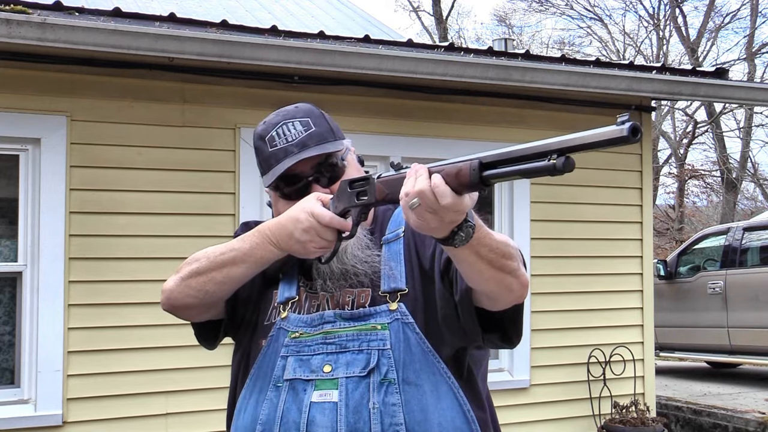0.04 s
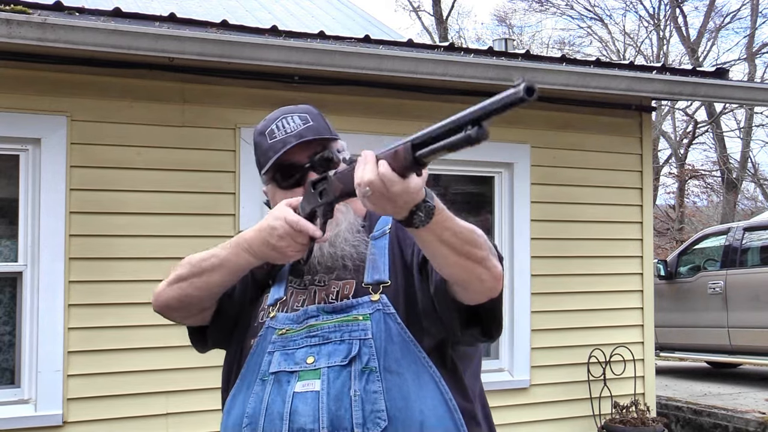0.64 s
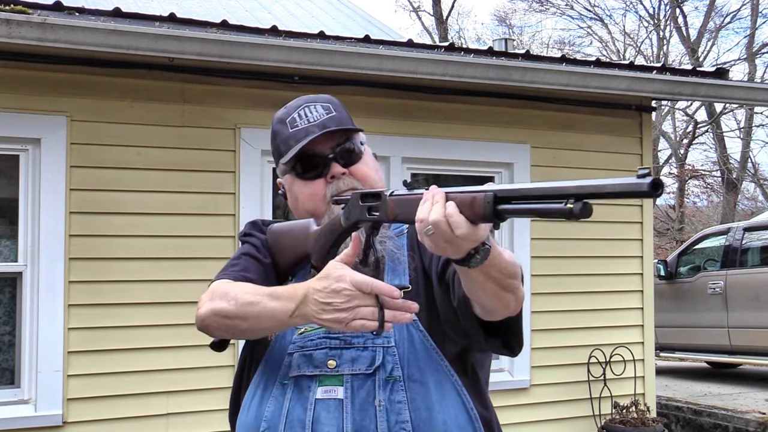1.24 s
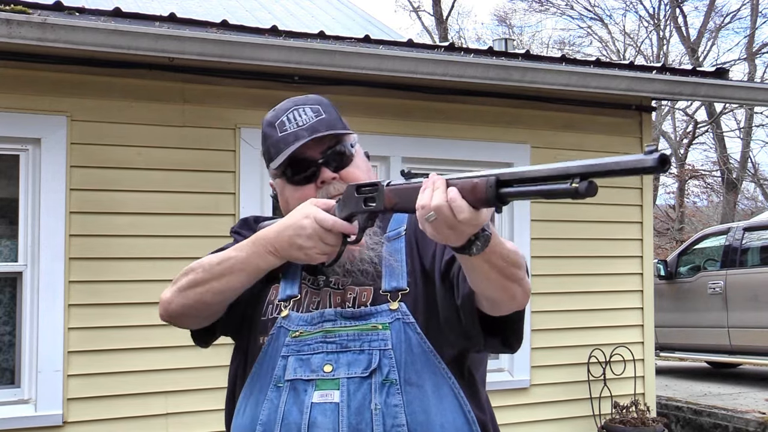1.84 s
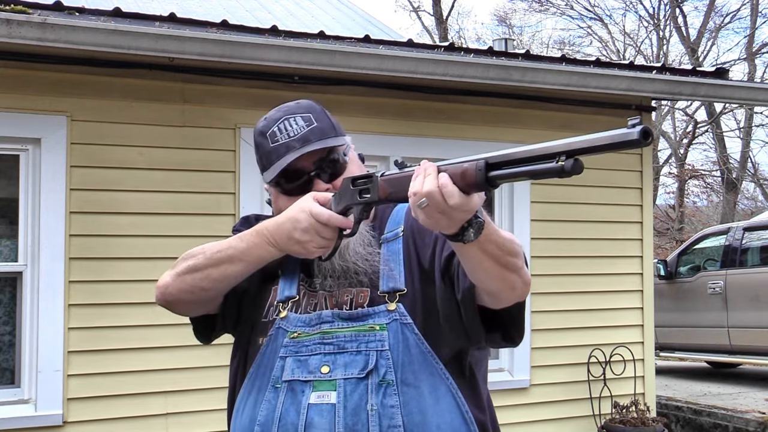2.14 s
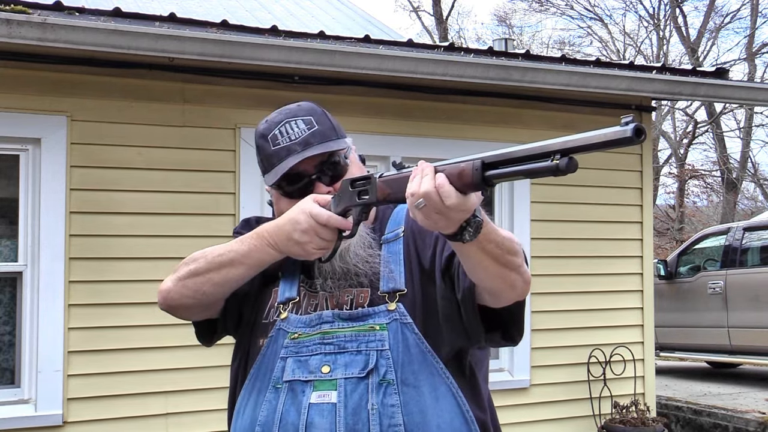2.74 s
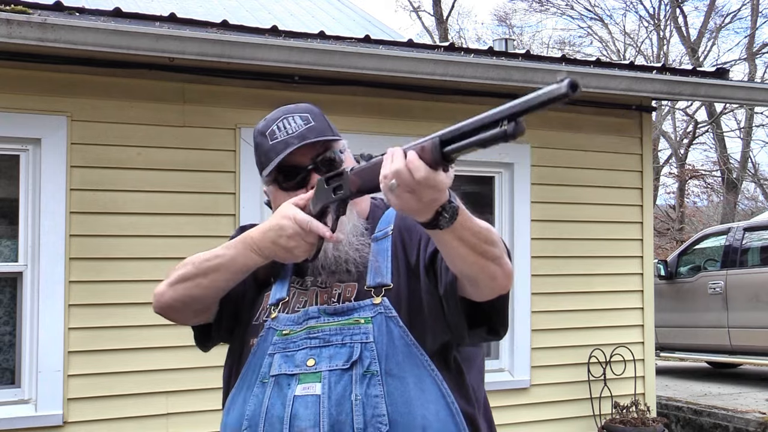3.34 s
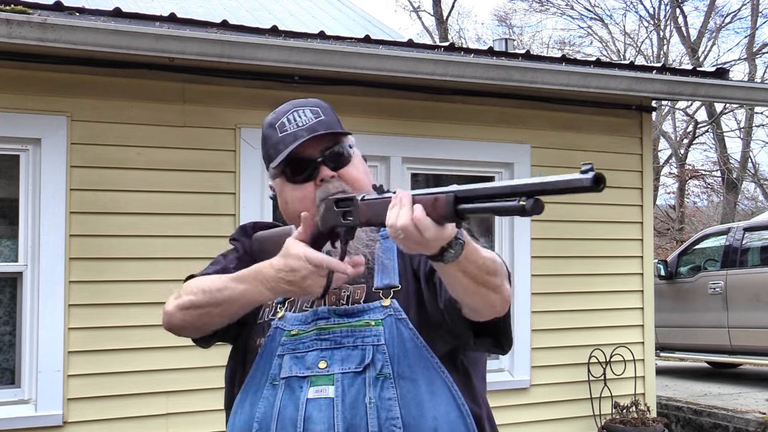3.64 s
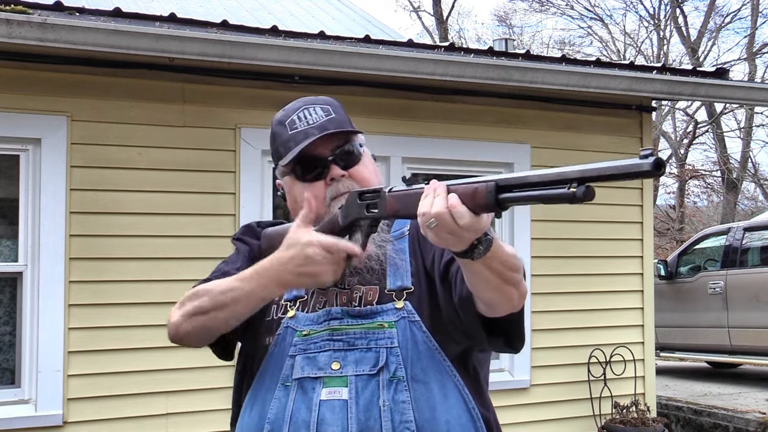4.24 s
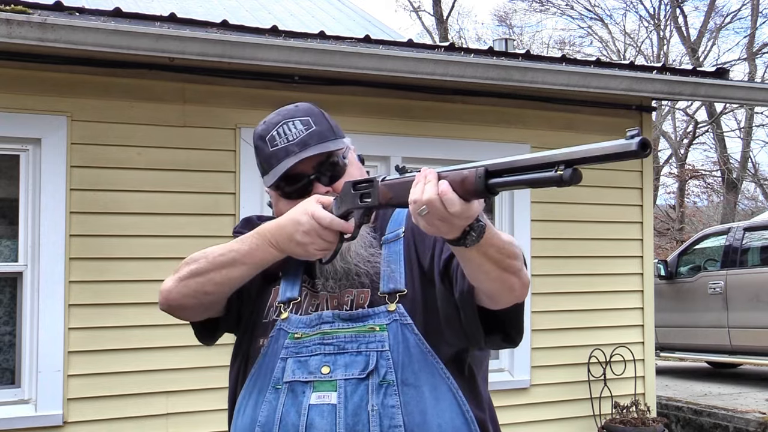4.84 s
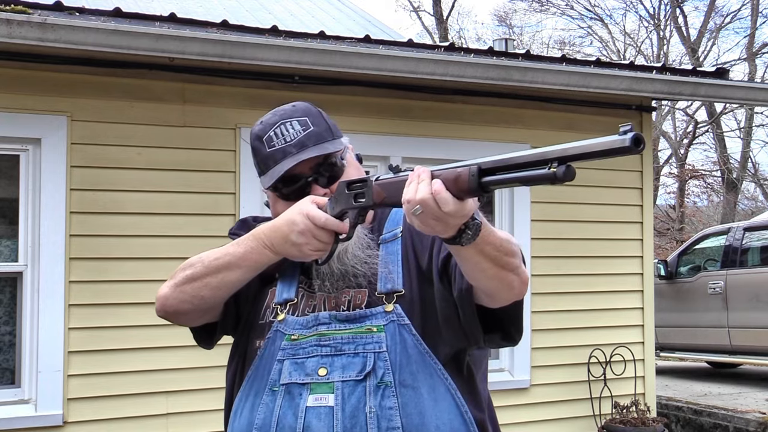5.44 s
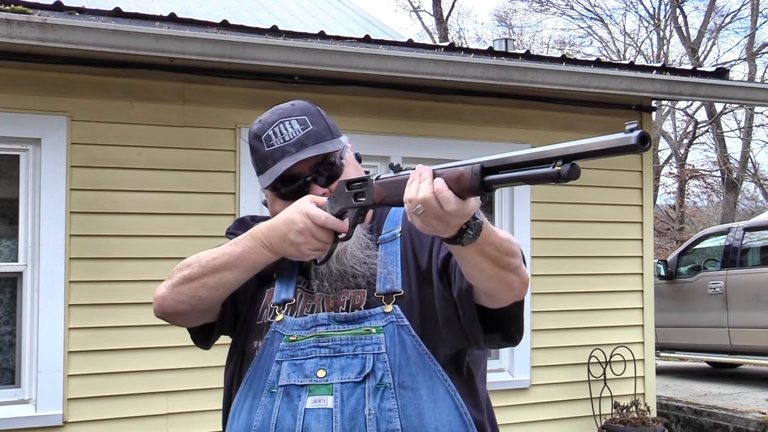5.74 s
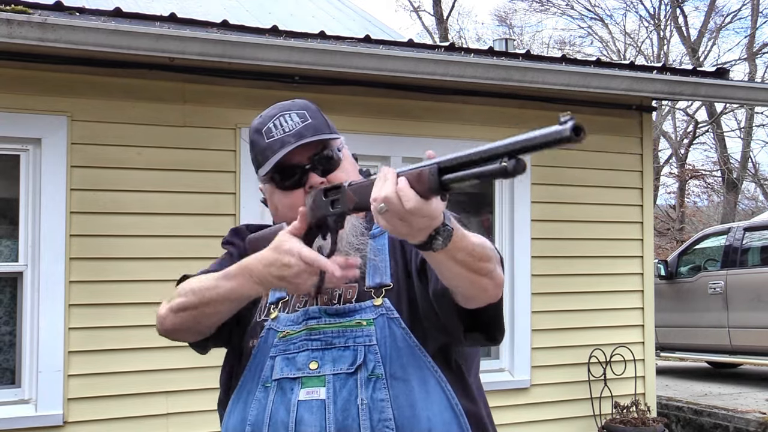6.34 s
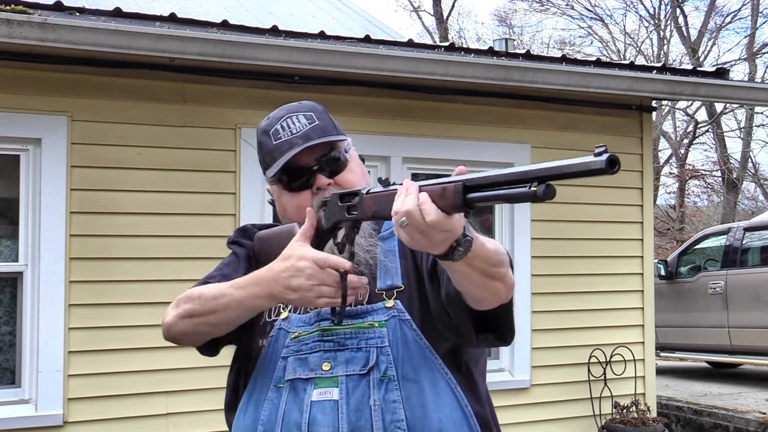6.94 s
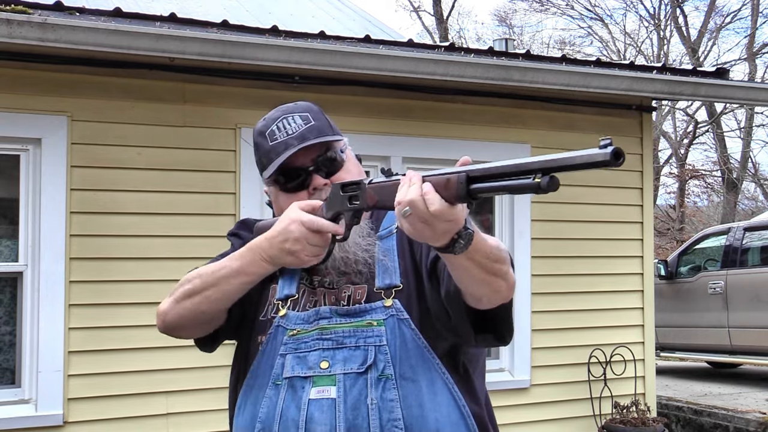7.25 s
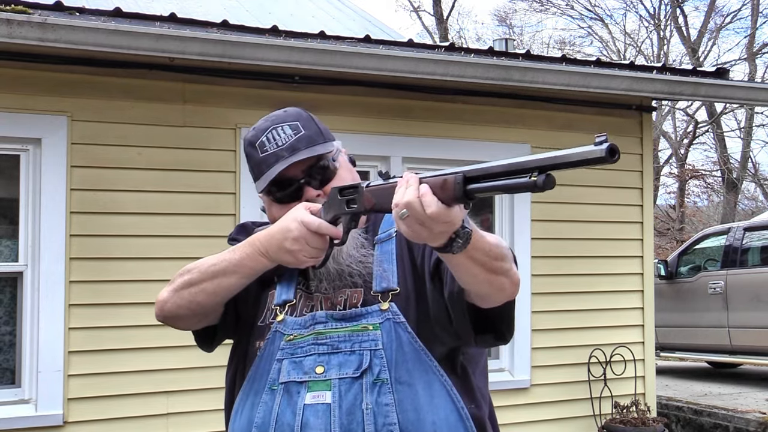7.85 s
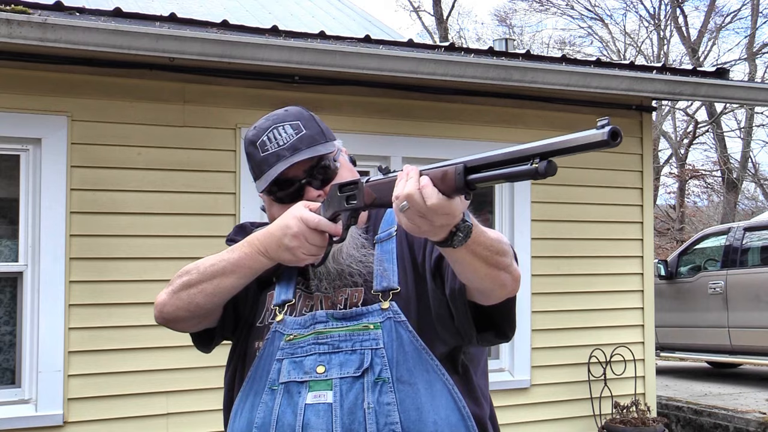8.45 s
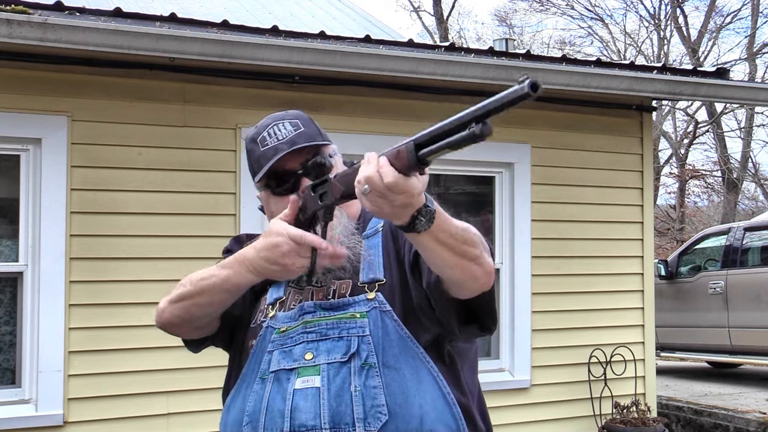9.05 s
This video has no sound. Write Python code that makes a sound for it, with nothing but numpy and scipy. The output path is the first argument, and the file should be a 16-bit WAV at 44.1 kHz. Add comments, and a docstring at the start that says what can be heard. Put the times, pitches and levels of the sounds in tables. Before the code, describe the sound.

Four loud rifle shots echo outdoors, with a lever action clacking and spent brass cases clinking between them.

```python
"""Lever-action rifle in a yard

Four shots are fired between a house and bare woods. Each blast overloads the microphone and rolls
back from the trees, its level held by fast limiters. Between shots the lever opens and shuts, steel
striking steel, and the spent brass case flies out ringing in its tube modes and bounces close by.
Gusts buffet the microphone and stir dry leaves."""
import sys
import numpy as np
from scipy import signal
from scipy.fft import rfft, irfft, next_fast_len
from scipy.io import wavfile
from scipy.ndimage import uniform_filter1d, minimum_filter1d

SR = 44100
rng = np.random.default_rng(int(sys.argv[2]) if len(sys.argv) > 2 else 0)


def digitize_waveform(pressure):
    """Quantize a signal to 16-bit integers and store it at the path in sys.argv[1].

    Rows of a 2-D input are taken as channels; values are limited to [-1, 1].
    """
    field = np.atleast_2d(pressure).T
    bounded = np.clip(field, -1, 1)
    quanta = np.round(bounded * 32767).astype(np.int16)
    wavfile.write(sys.argv[1], SR, quanta)


N = 400851

# spectra of rustling, metal contact and a clattering surface: (f/Hz, relative level/dB)
RUSTLE_SPECTRUM = [(300, -10.5), (1000, -4.5), (2800, -1), (4000, -3.5), (5800, -2.5), (9000, -12),
                   (15000, -22.5)]
STEEL_SPECTRUM = [(300, -34), (900, 0.5), (5500, 3), (8000, -1.5), (11500, -5.5), (15000, -20)]
CLATTER_SPECTRUM = [(300, -10.5), (1100, 1), (2500, 3.5), (4700, 8.5), (6300, 6.5), (8400, -5.5),
                    (12000, -6.5), (15000, -21)]
# modes of a knocked surface: (f/Hz, level/dB, T60/s)
SURFACE_MODES = [(1086, -11, 0.042), (1826, -21, 0.073), (2916, -3.5, 0.023), (5550, -8, 0.024)]
# lever openings: (unlock t/s, eject t/s, rear stop t/s, case glances off t/s, ring/dB, low modes/dB)
OPENINGS = [(1.015, 1.16, 1.176, 1.198, -10, -4.5), (3.749, 3.927, 3.961, 3.94, -2, -6),
            (6.464, 6.606, 6.647, 6.651, -9.5, -15)]
# hard landings of the case: (t/s, impact/dB, clatter/dB, nominal T60/s, ring/dB, high modes/dB)
LANDINGS = [(1.633, -1, 2.5, 0.45, -8.5, 2), (4.4141, -4.5, 1, 0.42, -9.5, -2),
            (4.679, -20, 2, 0.44, -19, 3), (7.3626, -2.5, -4.5, 0.3, -23, 0)]
# its bounces, in relative levels: (t/s, tick/dB, knock/dB, ring/dB, low modes/dB, high modes/dB)
BOUNCES = [(1.811, -12, -6, -24, 8.5, 14.5), (2.643, -27, -43, -38.5, -10, 1),
           (7.252, 5, -4, -5.5, -17, 3.5), (7.3445, -9, 5, -38, -10, 6), (7.5037, -4.5, -34, -19.5, 3, 2),
           (7.749, -18, -22, -23.5, 3.5, 5), (7.821, -26, -16.5, -38, -8, 10)]
CHATTER_T60_S, HAND_DAMPED_T60_S = .022, .055


def from_db(db):
    """Amplitude ratio of a level in decibels."""
    return 10 ** (np.asarray(db) / 20)


def fade(t, t60):
    """Exponential decay: 60 dB in t60 seconds."""
    return 1000. ** (-t / t60)


def add(track, at, sound):
    """Superposition: a sound joins the track at the given time."""
    start = max(round(at * SR), 0)
    track[start:start + len(sound)] += sound[:N - start]


def log_bins(size):
    """Log frequency of each Fourier bin."""
    return np.log(np.maximum(np.fft.rfftfreq(size, 1 / SR), 1))


def noise(spectrum, size):
    """Spectral shaping of white noise, to an rms near 1."""
    hz, db = np.transpose(spectrum)
    padded = next_fast_len(size, real=True)
    gain = from_db(np.interp(log_bins(padded), np.log(hz), db))
    return irfft(rfft(rng.standard_normal(padded)) * gain, padded)[:size] / np.sqrt(np.mean(gain ** 2))


def band_noise(band_hz, size):
    """Band-limited noise of unit rms."""
    bandpass = signal.butter(2, band_hz, "band", fs=SR, output="sos")
    band = signal.sosfilt(bandpass, rng.standard_normal(size))
    return band / band.std()


def dying_noise(spectrum, decay, size):
    """Frequency-dependent damping: each band of a diffuse sound dies at its own rate."""
    hz, t60s = np.transpose(decay)
    bins, t = rfft(noise(spectrum, size)), np.arange(size) / SR
    shares = [np.interp(log_bins(size), np.log(hz), row) for row in np.eye(len(hz))]
    return sum(irfft(bins * share, size) * fade(t, t60) for share, t60 in zip(shares, t60s))


def flicker(per_s, depth_db):
    """Random amplitude modulation with capped peaks."""
    steps = np.minimum(rng.standard_normal(N // 20), 1.5)
    return from_db(depth_db * np.interp(np.arange(N) / SR * per_s, np.arange(N // 20), steps))


def ring(t, hz, t60):
    """Free vibration of one damped mode."""
    return np.sin(2 * np.pi * hz * t) * fade(t, t60)


def struck(t, modes):
    """Modal superposition: a struck body rings in all its modes."""
    return sum(from_db(db) * ring(t, hz, t60) * (-1) ** k for k, (hz, db, t60) in enumerate(modes))


def wind(far_db=-36):
    """Turbulence buffets the microphone and rustles leaves over a steady far-off rush."""
    # gust strength: (t/s, rumble/dB, leaves/dB)
    breeze = [(0, -28, -43.5), (2.7, -24.5, -47), (4.1, -24, -42), (4.4, -14.5, -39.5), (5.55, -13.5, -36),
              (6.1, -22.5, -38), (7.6, -16.5, -32), (8.65, -30, -37.5)]
    # spectra of the buffeting and the far rush: (f/Hz, relative level/dB)
    rumble_spectrum = [(9, -2), (16, -2.5), (60, -27.5), (150, -49), (500, -50), (2000, -100)]
    far_spectrum = [(30, -23), (70, 3), (130, -1.5), (250, -5), (450, -11.5), (750, -10.5), (3000, -29),
                    (10000, -47)]
    at, *levels = np.transpose(breeze)
    rumble_gain, leaf_gain = [from_db(np.interp(np.arange(N) / SR, at, db)) for db in levels]
    rustle = noise(RUSTLE_SPECTRUM, N) * flicker(per_s=610, depth_db=2) * flicker(per_s=16, depth_db=2)
    rumble = rumble_gain * noise(rumble_spectrum, N)
    return rumble + leaf_gain * rustle + from_db(far_db) * noise(far_spectrum, N)


def hammer(t, level_db=-4, t60=0.033, attack_s=0.00057):
    """The brief impact of the hammer radiates a broadband click."""
    # click spectrum: (f/Hz, relative level/dB)
    spectrum = [(400, -12), (3200, 6), (11000, -5), (15000, -30)]
    return from_db(level_db) * noise(spectrum, len(t)) * fade(t, t60) * np.minimum(t / attack_s, 1)


def muzzle_blast():
    """Sudden expansion of gas: a broadband burst whose bass lasts longest."""
    # blast spectrum (f/Hz, relative level/dB) and decay (f/Hz, T60/s)
    spectrum = [(40, -8), (200, -3), (2000, -1), (6000, 9), (10000, -1), (15000, -9.5)]
    decay = [(200, 0.43), (1500, 0.096), (6000, 0.12), (14000, 0.12)]
    return dying_noise(spectrum, decay, SR)


def yard_reverberation(level_db=33):
    """Dense early reflections prolong the blast."""
    # reverberant spectrum (f/Hz, relative level/dB) and decay (f/Hz, T60/s)
    spectrum = [(40, -6), (90, -26), (170, -0.5), (480, 0.5), (2000, 0), (5800, -9), (8000, -21),
                (15000, -38)]
    decay = [(200, 0.46), (2000, 0.29), (14000, 0.37)]
    return from_db(level_db) * dying_noise(spectrum, decay, SR)


def woods_echo(t, swell_s=0.095):
    """Scattering: the roll builds as the blast reaches more and more trunks."""
    # scattered spectrum (f/Hz, relative level/dB) and decay (f/Hz, T60/s)
    spectrum = [(40, -23), (80, -7), (155, 1.5), (270, -3.5), (450, -7.5), (650, -4), (950, -4), (1230, -7),
                (1700, -4.5), (3000, -7.5), (5800, -7), (8000, -16), (11000, -20.5), (15000, -34)]
    decay = [(150, 2.13), (750, 2.6), (2000, 2.12), (5000, 1.23), (9000, 0.83), (14000, 0.3)]
    reached = 1 - np.exp(-(t / swell_s) ** 2)
    return reached * dying_noise(spectrum, decay, len(t))


def slope_echoes(t, spread_s=0.038, band_hz=(500, 1100)):
    """Diffuse reflection: each wooded slope returns a swell after its travel time."""
    # echoes: (delay/s, level/dB)
    slopes = [(.23, -9.5), (.44, -11), (.56, -8.5)]
    swells = sum(from_db(db) * np.exp(-((t - delay) / spread_s) ** 2) for delay, db in slopes)
    return band_noise(band_hz, len(t)) * swells


def hills_echo(t, level_db=-21, t60=6.97):
    """Air absorption leaves the long tail from far hills dull."""
    # tail spectrum: (f/Hz, relative level/dB)
    spectrum = [(60, 4), (180, -9), (780, 3), (2500, -14), (6000, -53)]
    return from_db(level_db) * noise(spectrum, len(t)) * fade(t, t60)


def shots(hammer_lead_s=.0072, wall_delay_s=.042, wall_db=32, wall_t60=0.045, wall_hz=(45, 340)):
    """Multipath propagation: hammer and blast are followed by yard, wall, woods and hills."""
    # firings: (t/s, blast/dB, woods echo/dB)
    firings = [(0.2472, 38, 9.5), (3.1626, 38, 9.5), (6.0075, 38.5, 10), (8.682, 40.5, 11)]
    out, t = np.zeros(N), np.arange(3 * SR) / SR
    for at, blast_db, woods_db in firings:
        add(out, at - hammer_lead_s, hammer(t[:SR]))
        add(out, at, from_db(blast_db) * muzzle_blast() + yard_reverberation())
        wall_boom = from_db(wall_db) * band_noise(wall_hz, SR) * fade(t[:SR], wall_t60)
        add(out, at + wall_delay_s, wall_boom)
        add(out, at, from_db(woods_db) * woods_echo(t) + slope_echoes(t) + hills_echo(t))
    return out


def stroke(start, end):
    """Sliding speed: a half sine between two times."""
    return np.sin(np.pi * np.clip((np.arange(N) / SR - start) / (end - start), 0, 1))


def lever_open(slide_db=-21, lead_s=0.11, after_s=0.095, cam_s=0.073):
    """Friction noise follows speed as the breech unlocks and the bolt slides back."""
    out, t = np.zeros(N), np.arange(SR // 4) / SR
    friction = noise(STEEL_SPECTRUM, N) * flicker(per_s=360, depth_db=7)
    for unlock, _, stop, *_ in OPENINGS:
        add(out, stop, knock(t))   # the rear stop knocks the whole rifle
        speed = stroke(unlock, unlock + cam_s) + stroke(stop - lead_s, stop + after_s)
        out += from_db(slide_db) * speed * friction
    return out


def yard_echo(x, wet_db=-13, t60=0.26):
    """Faint scatter from house wall and ground, by convolution with a decaying response."""
    response = noise(CLATTER_SPECTRUM, SR // 2) * fade(np.arange(SR // 2) / SR, t60)
    return from_db(wet_db) * signal.fftconvolve(x, response / np.linalg.norm(response))[:N]


def chatter(t, hold_s, attack_s=0.00081):
    """Tiny collisions of metal merge into noise for a moment, then die away."""
    envelope = np.minimum(t / attack_s, 1) * fade(np.maximum(t - hold_s, 0), CHATTER_T60_S)
    return noise(STEEL_SPECTRUM, len(t)) * envelope


def contact(t, chatter_db=-5, body_db=-8.5, body_cycles=170, spread_db=5, detune=0.0357):
    """Steel on steel: chatter, and modes whose strength and pitch vary from hit to hit."""
    # modes of receiver and bolt: (f/Hz, relative level/dB)
    modes = [(2080, -6), (2710, -6), (3320, -3.5), (4500, -4.5), (5400, -10), (6420, -3.5), (10400, -7),
             (11820, -9)]
    out = from_db(chatter_db) * chatter(t, hold_s=0.0045)
    for (hz, db), (strength, shift) in zip(modes, rng.uniform(-1.14, 1, (len(modes), 2))):
        t60 = np.clip(body_cycles / hz, 2 * CHATTER_T60_S, HAND_DAMPED_T60_S)
        amplitude = rng.choice([-1, 1]) * from_db(body_db + db + spread_db * strength)
        out += amplitude * ring(t, hz * (1 + detune * shift), t60)
    return out


def clacks():
    """Impact excitation: the parts of the action hit their stops in turn."""
    # strikes of breech, hammer, ejector, lifter and latch: (t/s, level/dB)
    strikes = [(1.0238, -2), (1.037, -1), (1.129, -8), (1.1503, 0), (1.162, -3), (1.176, -2), (1.198, 0.5),
               (1.4873, -17.5), (1.7485, -11), (1.756, -2), (1.763, -2.5), (1.7699, -4.5), (3.75, -1),
               (3.7646, 0), (3.900, -8.5), (3.9168, -3), (3.94, 3), (3.961, 0), (3.968, -4), (4.222, -18.5),
               (4.3977, -12.5), (6.4641, 3), (6.477, 4), (6.575, -6), (6.608, -4), (6.625, -1),
               (6.652, -3.5), (6.9618, -15), (7.107, -6.5), (7.17, -14.5)]
    out, t = np.zeros(N), np.arange(SR // 4) / SR
    for at, db in strikes:
        add(out, at, from_db(db) * contact(t))
    return out


def case_ring(t, at, level_db, low_db, high_db, spin_hz=22, spin_depth=0.49, doppler_hz=36,
              detune_hz=7, damp_t60=0.26):
    """Tumbling modulates the case's ring in level and, by Doppler shift, in pitch; a touch damps it."""
    # closely grouped modes of a thin brass tube: (f/Hz, level/dB, T60/s)
    modes = [(3851, 0, .5), (9030, -11, .4), (9064, -2, .48), (9090, -12, .4), (13310, -20, .4),
             (13835, -17, .15), (13895, -2, .22), (13917, -10, .2)]
    # tuning of each of the three cases: (frequency ratio)
    tunings = (1, 1.001, .9955)
    vigour = from_db(0.41 * level_db)   # a harder hit scales up spin and Doppler shift
    turn = 2 * np.pi * spin_hz * vigour * rng.uniform(0.59, 1.94) * t
    next_touch = min((row[0] for row in BOUNCES + LANDINGS if row[0] > at), default=np.inf)
    damping = fade(np.maximum(at + t - next_touch, 0), damp_t60)
    low_hz, middle_hz, high_hz = modes[0][0], modes[3][0], modes[-1][0]
    tuning = tunings[sum(at > row[0] for row in OPENINGS[1:])]
    warped_t = tuning * t + vigour * doppler_hz / middle_hz * np.cumsum(np.sin(turn)) / SR
    out = np.zeros(len(t))
    for hz, db, t60 in modes:
        tilt_db = np.interp(hz, [low_hz, middle_hz, high_hz], [low_db, 0, high_db])
        amplitude = from_db(db + tilt_db) * rng.choice([-1, 1])
        out += amplitude * ring(warped_t, hz + detune_hz * rng.standard_normal(), t60)
    return from_db(level_db) * (1 + spin_depth * np.cos(turn)) * damping * out


def spent_case(eject_db=-23):
    """Each collision excites the case's modes as it is flicked out, glances off, lands and bounces."""
    # balance of the ring at ejection: (low modes/dB, high modes/dB)
    eject_colour = (-14, 7.8)
    # damping of the clatter: (f/Hz, multiple of the nominal T60)
    clatter_decay = [(700, 1.31), (13000, 0.63)]
    # rattles against something hollow (t/s, level/dB) and its modes (f/Hz, level/dB, T60/s)
    clinks = [(7.267, 1.5), (7.673, -11.5)]
    hollow_modes = [(1670, -5, 0.035), (1804, -2, 0.055), (2050, -5, 0.03)]
    out, t = np.zeros(N), np.arange(SR * 3 // 4) / SR
    for _, eject, _, glance, ring_db, low_db in OPENINGS:
        add(out, eject, case_ring(t, eject, eject_db, *eject_colour))
        add(out, glance, case_ring(t, glance, ring_db, low_db, high_db=0.5))
    for at, impact_db, clatter_db, t60, ring_db, high_db in LANDINGS:
        decay = [(hz, multiple * t60) for hz, multiple in clatter_decay]
        impact = from_db(impact_db) * chatter(t, hold_s=0.0086)
        clatter = from_db(clatter_db) * dying_noise(CLATTER_SPECTRUM, decay, len(t))
        add(out, at, impact + clatter + case_ring(t, at, ring_db, low_db=-12, high_db=high_db))
    for at, tick_db, knock_db, ring_db, *colour in BOUNCES:
        impact = from_db(tick_db) * tick(t) + from_db(knock_db) * knock(t)
        add(out, at, impact + case_ring(t, at, ring_db, *colour))
    for at, db in clinks:
        clink = signal.fftconvolve(rattle(t, per_s=350, t60=.2), struck(t, hollow_modes))
        add(out, at, from_db(db) * clink)
    return out


def knock(t, thud_db=-6, t60=0.11):
    """Heavily damped modes and a thud: the dull response of a struck surface."""
    # thud spectrum: (f/Hz, relative level/dB)
    spectrum = [(300, -35), (1000, 1.5), (1900, 7.5), (3200, -1), (6000, 0), (14000, -15)]
    return from_db(thud_db) * noise(spectrum, len(t)) * fade(t, t60) + struck(t, SURFACE_MODES)


def cartridge(t, db, hz, ring_db=-9, t60=0.063, soft_hz=11000):
    """A softer contact loses treble; the loose cartridge rings even at a light touch."""
    touch = signal.sosfilt(signal.butter(1, soft_hz, fs=SR, output="sos"), contact(t))
    return from_db(db) * touch + from_db(db * .5 + ring_db) * ring(t, hz + rng.normal(0, 100), t60)


def lever_close(cartridge_hz=7050, slide_db=-25, resonance_db=11):
    """Friction and light impacts excite the next cartridge's resonance as the bolt chambers it."""
    # forward slides of the bolt: (one end t/s, other end t/s)
    feeds = [(1.53, 1.69), (4.24, 4.16), (6.97, 7.14)]
    # the cartridge drops on the lifter, rattles up the ramp and seats: (t/s, level/dB)
    touches = [(1.353, -22), (1.536, -17), (1.569, -13), (1.598, -9), (1.616, -7), (4.119, -26),
               (4.258, -14), (4.294, -5), (4.319, -8), (4.341, -4), (6.982, -13), (7.007, -10.5),
               (7.0705, -2.5)]
    out, t = np.zeros(N), np.arange(SR // 4) / SR
    friction = noise(STEEL_SPECTRUM, N) * flicker(per_s=440, depth_db=6.5)
    resonance = signal.lfilter(*signal.iirpeak(cartridge_hz, Q=20, fs=SR), friction)
    scrape = friction + from_db(resonance_db) * resonance
    for start, end in feeds:
        out += from_db(slide_db) * scrape * stroke(start, end) ** 2
    for at, db in touches:
        add(out, at, cartridge(t, db, cartridge_hz))
    return out


def tick(t, click_db=-3, t60=0.011, shiver_db=-16, shiver_t60=0.21):
    """A short, hard contact of brass gives a broadband click; the surface shivers after it."""
    click = from_db(click_db) * noise(STEEL_SPECTRUM, len(t)) * fade(t, t60)
    return click + from_db(shiver_db) * noise(CLATTER_SPECTRUM, len(t)) * fade(t, shiver_t60)


def settling(snap_db=7, snap_hz=3000, snap_t60=0.00063, knock_db=-6, ring_db=-50):
    """Inelastic rebounds bring the case to rest, each a snap with a short woody answer."""
    # last hops: (t/s, level/dB)
    hops = [(1.9483, -1), (1.9515, -3), (2.0027, -3.5), (2.0574, -7)]
    # light touches favour the top of the ring: (low modes/dB, high modes/dB)
    hop_colour = (3.6, 20)
    out, t = np.zeros(N), np.arange(SR // 2) / SR
    snap = from_db(snap_db) * ring(t, snap_hz, snap_t60)
    for at, db in hops:
        damped_knock = .5 * knock(t) * fade(t, t60=.11)
        answer = from_db(knock_db) * (struck(t, SURFACE_MODES[:2]) + damped_knock)
        add(out, at, from_db(db) * (snap + answer + case_ring(t, at, ring_db, *hop_colour)))
    return out


def handling(brush_db=-9, swell_s=0.0099, tick_db=-8, tick_t60=0.04, creaks_per_s=9, creak_db=-33):
    """Friction of hand and sleeve on the rifle: soft brushes, dry ticks and faint creaks."""
    # the grip shifts on the stock, and ticks as it tightens: (t/s, relative level/dB)
    shifts = [(5.5395, -24), (7.975, -17), (8.455, -26.5)]
    grip_ticks = [(2.1113, -27), (2.3218, -27), (2.3453, -16.5), (5.8449, -19), (8.2155, -18)]
    out, t = np.zeros(N), np.arange(SR // 4) / SR
    swell = t / swell_s * np.exp(1 - t / swell_s)
    for at, db in shifts:
        add(out, at, from_db(db + brush_db) * noise(RUSTLE_SPECTRUM, len(t)) * swell)
    for at, db in grip_ticks:
        add(out, at, from_db(db + tick_db) * noise(CLATTER_SPECTRUM, len(t)) * fade(t, tick_t60))
    slips = (rng.random(N) < creaks_per_s / SR) * rng.random(N)
    creak_envelope = signal.fftconvolve(slips, fade(t, 2 * tick_t60))[:N]
    return out + from_db(creak_db) * noise(CLATTER_SPECTRUM, N) * creak_envelope


def rattle(t, per_s, t60):
    """A first impulse and a dying Poisson train of smaller ones, of unit energy."""
    touches = (rng.random(len(t)) < per_s / SR) * rng.uniform(-1, 1, len(t)) * fade(t, t60)
    touches[0] = 1
    return touches / np.linalg.norm(touches)


def scene():
    """The pressures of all sources add at one microphone."""
    action = lever_open() + lever_close() + clacks()
    return (shots() + action + yard_echo(action) + spent_case() + settling() + handling() + wind())[None]


def limiter(x, ceiling_db=1.0, release_db_per_s=105, attack_s=0.0011):
    """Automatic gain control: the gain drops quickly on a peak and climbs back at a steady rate."""
    excess_db = np.maximum(20 * np.log10(np.abs(x) + 1e-9) - ceiling_db, 0)
    climb_db = release_db_per_s * np.arange(N) / SR
    reduction_db = np.maximum.accumulate(excess_db + climb_db, axis=-1) - climb_db
    pole = np.exp(-1 / (attack_s * SR))
    return x * from_db(-signal.lfilter([1 - pole], [1, -pole], reduction_db))


def catch_peaks(x, window_samples=15):
    """Look-ahead limiting ducks whatever still passes full scale."""
    safe_gain = np.minimum(1 / (np.abs(x) + 1e-9), 1)
    return x * uniform_filter1d(minimum_filter1d(safe_gain, window_samples), window_samples)


def record(dry, push_db=23, pull_db=32, coupling_hz=14, cutoff_hz=15700):
    """The capsule saturates asymmetrically; AC coupling, two limiters and a steep low-pass follow."""
    ceiling = np.where(dry > 0, from_db(push_db), from_db(pull_db))
    saturated = ceiling * np.tanh(dry / ceiling)
    coupled = signal.sosfilt(signal.butter(1, coupling_hz, "high", fs=SR, output="sos"), saturated)
    levelled = catch_peaks(limiter(coupled))
    return signal.sosfilt(signal.ellip(10, .1, 70, cutoff_hz, fs=SR, output="sos"), levelled)


dry = scene()
out = record(dry)
digitize_waveform(out)
```